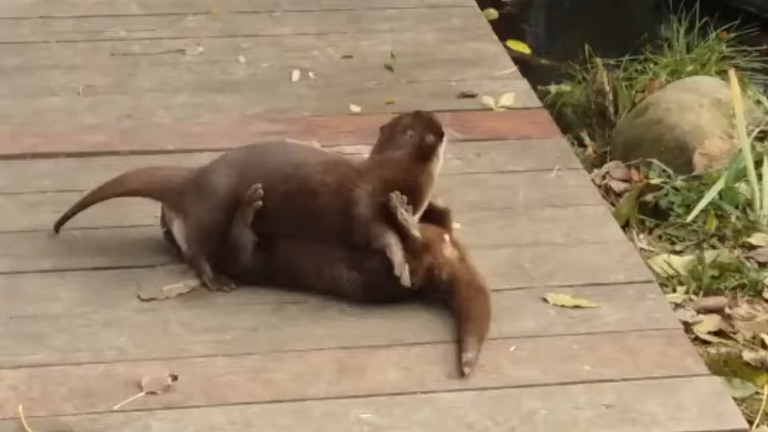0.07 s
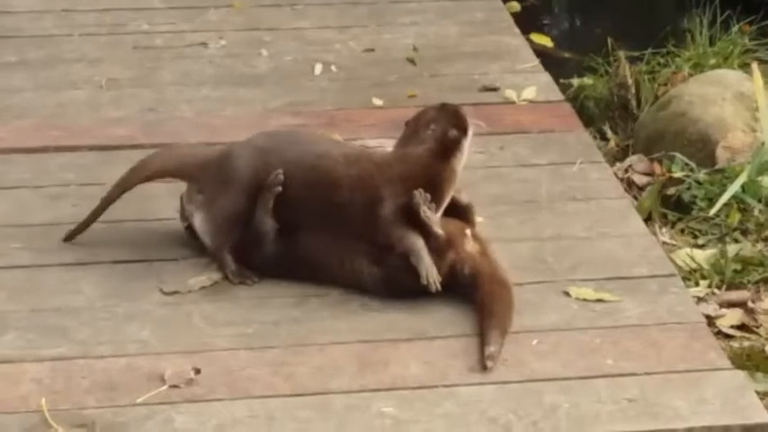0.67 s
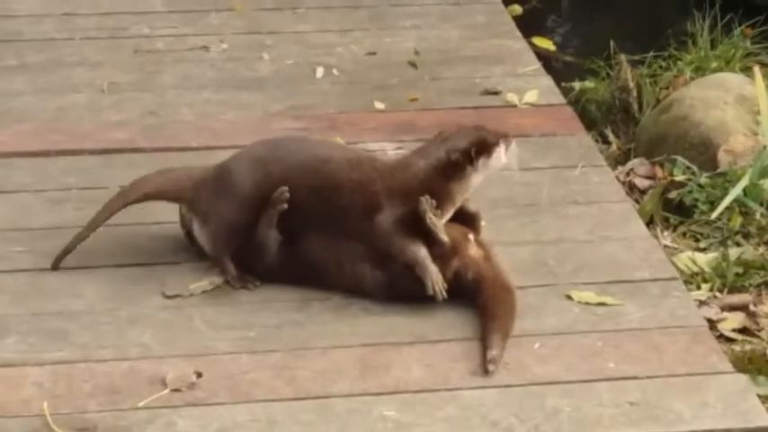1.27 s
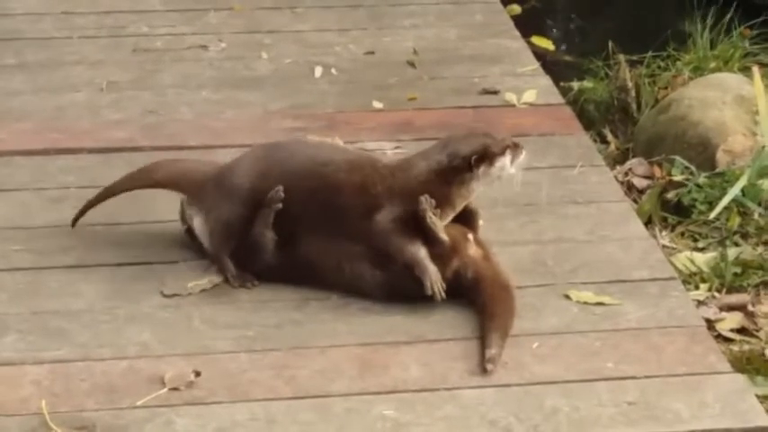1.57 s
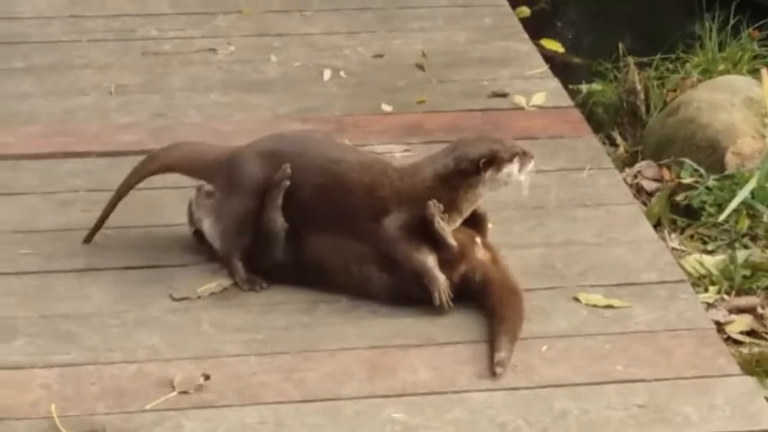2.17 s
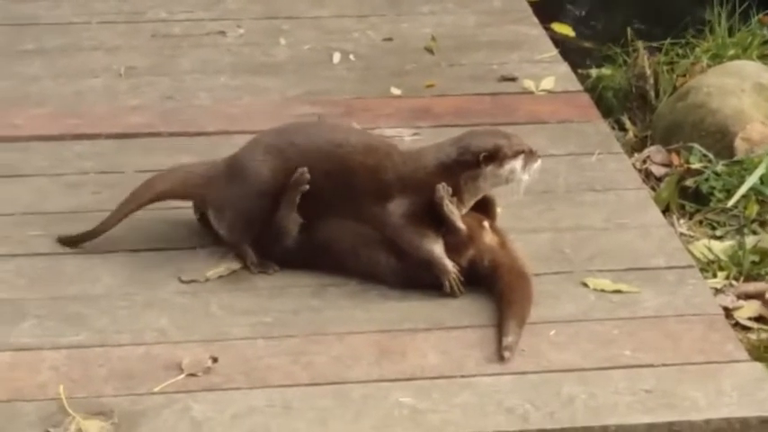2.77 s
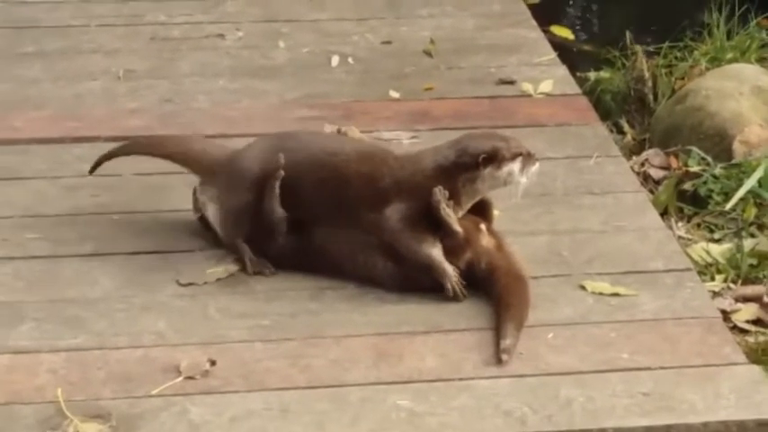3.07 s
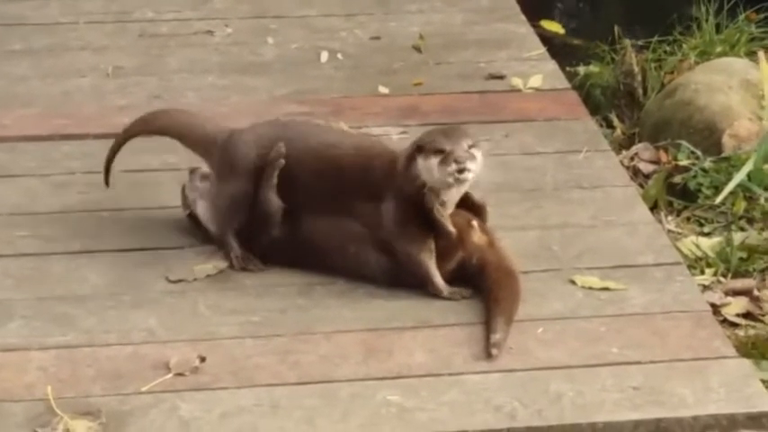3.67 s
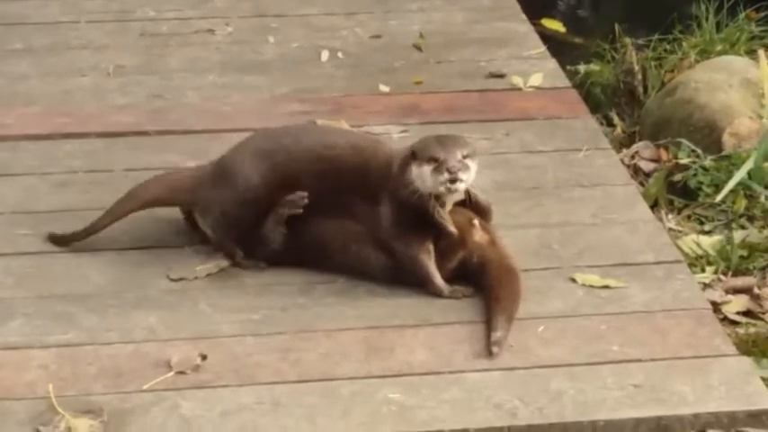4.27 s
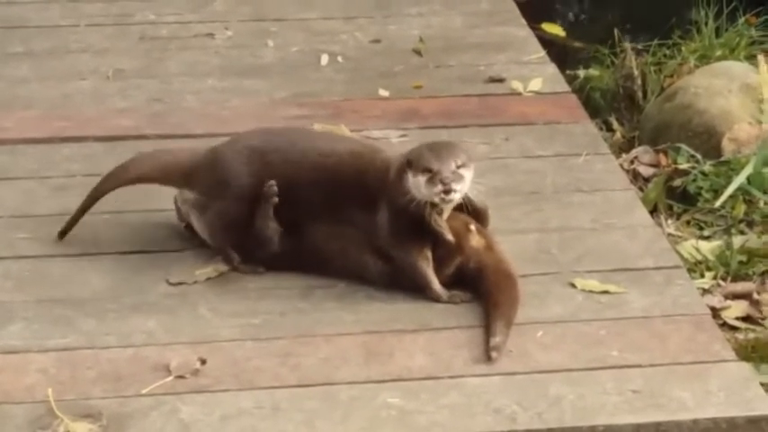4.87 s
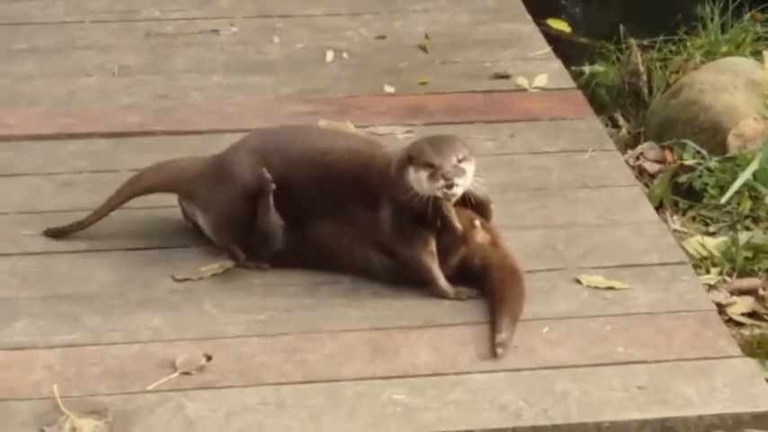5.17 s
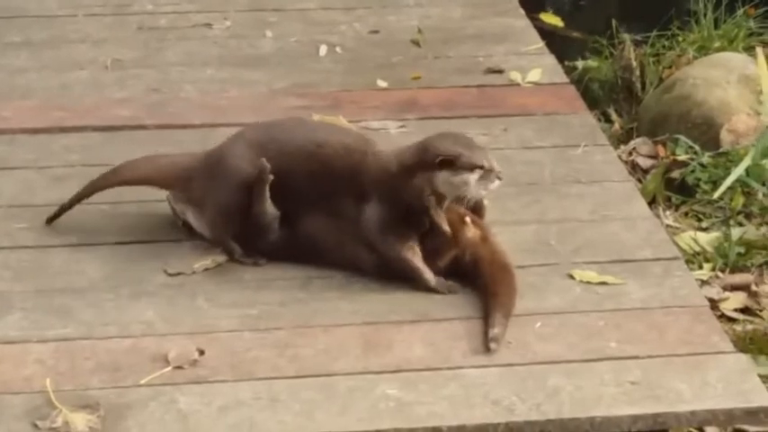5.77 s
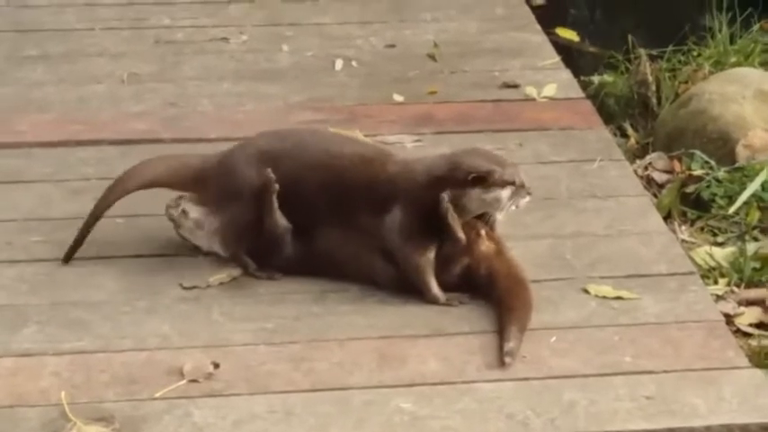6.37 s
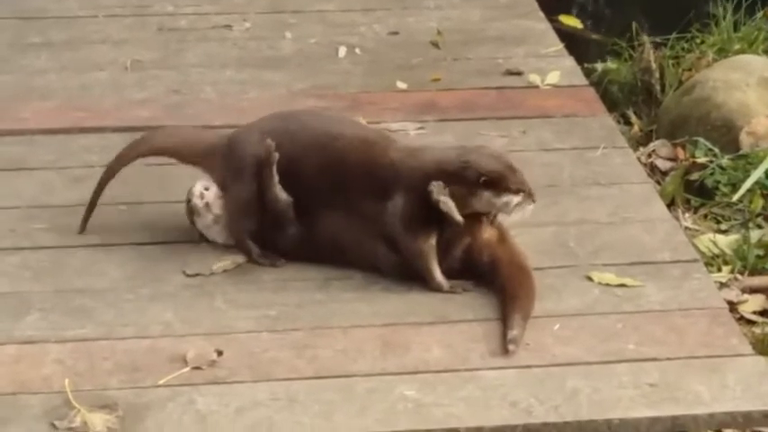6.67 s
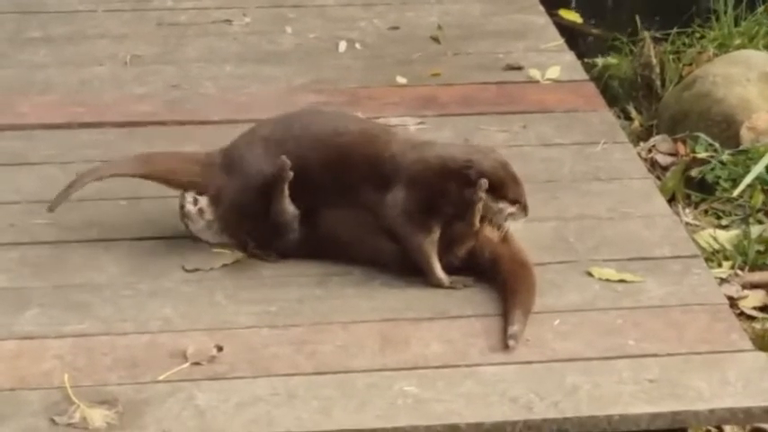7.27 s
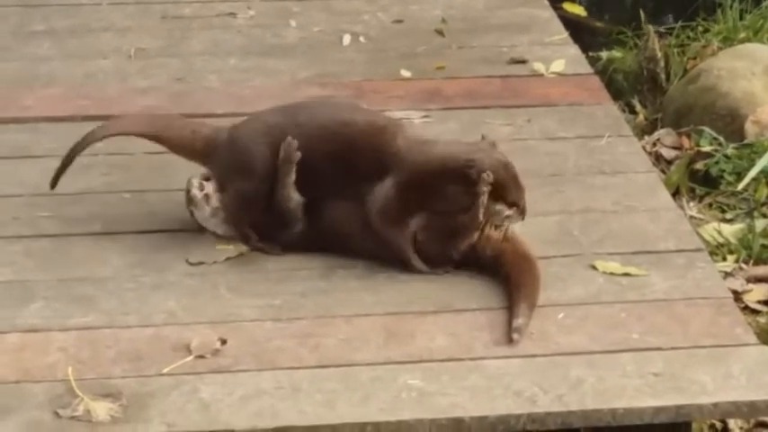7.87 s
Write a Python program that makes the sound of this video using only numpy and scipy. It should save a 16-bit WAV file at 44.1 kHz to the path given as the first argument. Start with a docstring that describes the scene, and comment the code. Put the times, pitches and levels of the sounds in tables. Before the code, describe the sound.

After a brief silence, at about 0.4 seconds, two otters start long, high squeals together on an outdoor wooden deck, over a soft steady hiss. Wind buffets the microphone with low rumble and thumps, louder than the voices from 0.6 to 1.5 seconds and dying away by 2. The calls slide slightly down onto wavering notes, so close in pitch that they beat against each other. Fresh wails begin around 2.3 and 2.7 seconds, growing brighter and louder from 3.5. Both otters start again just after 4 seconds, with small raspy catches in the voice, the clearest near 5.4. At 6 seconds one begins the loudest wail, and the other joins with a nasal whine at about 6.7. Both hold until the end, around 8 seconds. Lighter wind gusts return near 4 seconds and between 5.5 and 7.5.

```python
"""On a wooden deck outdoors, two otters wail together in long, overlapping squeals.
Each voice is a source and a filter: the vocal folds make harmonics, which throat and mouth shape.
A call starts high and sinks onto a wavering note near 850 Hz; the two close pitches beat.
The boards return short reflections, and turbulent gusts buffet the microphone over a soft hiss."""
import sys
import numpy as np
from scipy import signal
from scipy.fft import rfft, irfft, next_fast_len
from scipy.io import wavfile
from scipy.ndimage import uniform_filter1d

SR = 44100
rng = np.random.default_rng(int(sys.argv[2]) if len(sys.argv) > 2 else 0)


def generate_wav(sig):
    """Save sig (samples, or channels by samples) to the path in sys.argv[1] as 16-bit PCM at SR."""
    pcm = np.round(np.clip(np.atleast_2d(sig).T, -1, 1) * 32767).astype(np.int16)
    wavfile.write(sys.argv[1], SR, pcm)


N = 357651
T = np.arange(N) / SR
START_S = .42  # silent until here
SIDES = np.array([[.5], [-.5]])  # splits a difference between the left and right microphone ports


def undb(db):
    """Amplitude ratio of a level in decibels."""
    return 10 ** (np.asarray(db) / 20)


def unit(x):
    """Normalisation to rms 1."""
    return x / np.sqrt(np.mean(x ** 2) + 1e-18)


def curve(rows, at=T):
    """Linear interpolation between (position, value) rows."""
    return np.interp(at, *np.transpose(rows))


def gain_at(spectrum, hz):
    """Magnitude response of (f/Hz, gain/dB) rows, interpolated in log frequency."""
    f, db = np.transpose(spectrum)
    return undb(np.interp(np.log(hz + 1), np.log(f), db))


def colour(x, spectrum):
    """Zero-phase filtering by (f/Hz, gain/dB) rows."""
    size = next_fast_len(x.shape[-1])
    hz = np.arange(size // 2 + 1) * SR / size
    return irfft(rfft(x, size) * gain_at(spectrum, hz), size)[..., :x.shape[-1]]


def drift(rate_hz, size):
    """Random modulation: smooth steps between rate_hz Gaussian values a second."""
    place = np.arange(size) * rate_hz / SR
    steps = rng.standard_normal(N // 32)
    k = place.astype(int)
    blend = (place - k) ** 2 * (3 - 2 * (place - k))
    return steps[k] * (1 - blend) + steps[k + 1] * blend


# gusts: t/s, level/dB, half-width/s
GUST_SWELLS = [(0.603, -24, 0.069), (0.866, -26.5, 0.22), (1.06, -22, 0.054), (1.236, -22.5, 0.04),
               (1.496, -28, 0.097), (1.892, -36.5, 0.093), (2.644, -48, 0.027), (3.945, -36, 0.1),
               (4.426, -42.5, 0.35), (5.62, -37, .12), (5.895, -31, 0.035), (6.027, -30.5, 0.027),
               (6.44, -31, 0.06), (6.816, -28, 0.097), (7.237, -33, 0.11), (7.8, -41.5, 0.23)]
# windward bias, left minus right: t/s, level/dB
WINDWARD = [(.6, 7.5), (1.1, 13), (2, 12.5)]
# spectrum of the rumble: f/Hz, level/dB
RUMBLE_SPECTRUM = [(25, -49), (65, 4), (155, 0), (350, -23), (700, -34), (4000, -98)]
def wind(breeze_db=-74, flutter_db=4, eddy_db=-4, rumble_side=0.68):
    """Turbulence: stronger gusts shed smaller eddies, mostly at the windward port."""
    gust_power = sum(undb(db) ** 2 / np.cosh(np.clip((T - s) / half_s, -20, 20)) ** 2
                     for s, db, half_s in GUST_SWELLS)
    level_db = 10 * np.log10(undb(breeze_db) ** 2 + gust_power)
    side_db = SIDES * curve(WINDWARD)
    rumble = unit(colour(rng.standard_normal((2, N)), RUMBLE_SPECTRUM)) * undb(rumble_side * side_db)
    eddy_spectrum = [(60, -2.0), (290, 6.5), (1000, -34.5), (5000, -76)]
    eddies = unit(colour(rng.standard_normal((2, N)), eddy_spectrum))
    eddies *= undb(eddy_db + level_db - level_db.max() + side_db)
    return (rumble + eddies) * undb(level_db + flutter_db * drift(40, N))


# soft hiss, much quieter above 5 kHz: f/Hz, level/dB
HISS_SPECTRUM = [(60, 4.5), (400, 3.5), (1400, 4), (4300, -2), (5700, -19), (10000, -29.5)]
def background_hiss(level_db=-46, shared=0.87, swell_db=-0.6, rise_s=0.27):
    """Partial coherence: a soft hiss is partly alike on the two sides."""
    noise = rng.standard_normal((3, N))
    hiss = unit(colour(noise[:2] + shared * noise[2], HISS_SPECTRUM))
    rise = np.clip((T - START_S) / rise_s, 0, 1)
    return hiss * undb(level_db + swell_db * drift(6, N)) * rise


def pitch_and_level(call, note, t, flicks, push_db,
                    glide_s=.07, flick_s=0.0176, push_s=0.23, fade_db=8, fade_s=0.014):
    """Frequency and amplitude modulation: a call sinks onto its note, swells and fades."""
    overshoot, full_db, soft_db, swell_s = call[:4]
    age = t - note[0][0]
    remaining = np.maximum(note[-1][0] - t, 0)
    held_hz = curve(note, t)
    flick = sum(rise * np.exp(-((t - s) / flick_s) ** 2) for s, rise in flicks)
    bend = overshoot * np.exp(-age / glide_s) + flick
    swell_db = full_db - soft_db * np.maximum(1 - age / swell_s, 0)
    level_db = swell_db - fade_db * np.exp(-remaining / fade_s)
    # each percent the note is pushed above its running mean adds push_db
    mean_hz = uniform_filter1d(held_hz, int(push_s * SR), mode="nearest")
    push_percent = np.clip(100 * (held_hz / mean_hz - 1), -4, 4)
    return held_hz * (1 + bend), level_db + push_db * push_percent


# the upper otter's mouth: t/s, opening (0 shut, 1 wide)
MOUTH_OPENING = [(.5, 0.24), (.9, 0.48), (1.6, 0.54), (2.35, 0.33), (2.7, 0.081), (3.44, 0.047),
                 (3.56, 0.8), (3.75, 1), (5.7, 1), (5.82, 0.42)]
def squeal(call, note, shut, wide, flicks=(), gape_db=0, push_db=0, effort_tilt=0,
           tremor=0.00427, jitter=.0032, shimmer=0.087, wander_db=1.34, flicker_db=1.0, breath_db=-39,
           tighten=0.53, tilt_above_hz=3130, chest_s=0.31, attack_s=0.0036, release_s=0.008):
    """Source-filter model: the mouth shapes breath and the harmonics of unevenly vibrating folds."""
    start, end = note[0][0], note[-1][0]
    span = (T >= start) & (T < end + release_s)
    t = T[span]
    size = len(t)
    pitch, level_db = pitch_and_level(call, note, t, flicks, push_db)
    _, full_db, _, _, chest_db, bright_db = call
    # muscle tremor and cycle-to-cycle jitter
    hz = pitch * (1 + tremor * drift(55, size) + jitter * drift(600, size))
    phase = 2 * np.pi * np.cumsum(hz) / SR
    # a higher note tightens the throat, so its resonances rise with the pitch
    relaxed_hz = hz * (np.median(hz) / hz) ** tighten
    slow = slice(None, None, 64)  # control rate of the filter
    gape = curve(MOUTH_OPENING, t[slow])
    # below full voice the treble drops by effort_tilt dB an octave for each dB
    tilt_db = bright_db + effort_tilt * (level_db[slow] - full_db)
    tone, power = 0, 0
    for k in range(1, 18):
        tract_hz = k * relaxed_hz[slow]
        gain = gain_at(shut, tract_hz) ** (1 - gape) * gain_at(wide, tract_hz) ** gape
        gain *= undb(tilt_db * np.log2(np.maximum(k * hz[slow] / tilt_above_hz, 1)))
        if k == 1:  # the fundamental is fuller at the start of a call
            gain *= undb(chest_db * np.exp((start - t[slow]) / chest_s))
        gain = np.interp(t, t[slow], gain)
        power += gain ** 2 / 2
        waver_db = flicker_db * np.sqrt(k) * drift(28.02, size) + wander_db * drift(5.06, size)
        tone += gain * undb(waver_db) * np.sin(k * phase + 2 * np.pi * rng.random())
    # air escapes once a cycle, while the folds are apart
    breath = unit(colour(rng.standard_normal(size) * (1 + np.cos(phase)), wide))
    voice = tone / np.sqrt(power) * (1 + shimmer * drift(400, size)) + undb(breath_db) * breath
    edges = np.minimum((t - start) / attack_s, 1) * np.minimum((end - t) / release_s + 1, 1)
    out = np.zeros(N)
    # a wide mouth radiates gape_db more than a shut one
    out[span] = voice * edges * undb(level_db + gape_db * curve(MOUTH_OPENING, t))
    return out


# throat and mouth responses: f/Hz, then gain/dB for
# upper otter shut, wide, head down; lower otter muffled, free
TRACT_RESPONSES = [(920, -9.5, -13.5, -6, -16.5, -7), (1880, -6, -11.5, 2.5, -2.5, 0),
                   (2790, -2, 2.5, -7.5, -8.5, -6.5), (3450, -0.5, 1.5, -6, 5, 6),
                   (4080, 12, -4, -12, -5, -11.5), (5185, -18, -.5, -7.5, -14.5, -12),
                   (6080, -23, -17.5, -29, -24, -27), (6440, -18.5, -22.5, -18.5, -17.5, -20.5),
                   (7740, -16, -24, -18, -19.5, -13.5), (8180, -30.5, -6, -20.5, -37, -26.5),
                   (9840, -57, -44.5, -40.5, -44, -40), (11620, -70, -25, -45, -54, -35.5),
                   (13150, -65, -56, -48, -55, -60)]
def vocal_tract(column):
    """Formants: the resonances of one throat and mouth shape, as (f/Hz, gain/dB) rows."""
    return np.array(TRACT_RESPONSES)[:, [0, column]]


# the lower otter's calls: onset overshoot/fraction of pitch, full level/dB, onset softening/dB,
# swell time/s, onset boost of the fundamental/dB, treble tilt/(dB per octave)
LOWER_SQUEALS = [(0.0133, -36, 8.1, 0.2, 1, -2), (.168, -41.5, 1.3, 0.032, 7.2, -9),
                 (.074, -38.5, 6, 0.038, 10, -4.5), (.126, -34.5, 6.65, 0.43, 4.3, 0.5),
                 (.105, -27.5, 10.3, 0.26, 1.8, 2)]
# held pitch, one list a call: t/s, f/Hz
LOWER_PITCH = [
    [(0.43, 889), (0.714, 842.4), (0.895, 866), (0.918, 840)],
    [(1.32, 871), (1.399, 868), (1.466, 762), (1.6, 804), (1.723, 771), (1.924, 800), (2.248, 730)],
    [(2.65, 998), (2.764, 974), (2.832, 907), (2.966, 849), (3.132, 847), (3.307, 778), (3.469, 838),
     (3.708, 791)],
    [(4.08, 902), (4.238, 926), (4.736, 878), (4.979, 809), (5.113, 858), (5.318, 818.5), (5.446, 851),
     (5.577, 811)],
    [(6.021, 976), (6.163, 993.5), (6.317, 900), (6.391, 880), (6.709, 809.3), (6.874, 844.3), (7.048, 812),
     (7.319, 861), (7.415, 817.5), (7.692, 860), (7.764, 821), (8.11, 807)],
]
def lower_otter():
    """Spectral tilt: falling squeals with a formant near 3.4 kHz brighten with vocal effort."""
    muffled, free = vocal_tract(column=4), vocal_tract(column=5)
    *cries, wail = zip(LOWER_SQUEALS, LOWER_PITCH)  # muffled under its mate until the last, loudest call
    crying = sum(squeal(*cry, muffled, muffled, push_db=1.72, effort_tilt=1.0) for cry in cries)
    return crying + squeal(*wail, free, free, push_db=0.9, effort_tilt=0.65)


# the upper otter's calls: columns as in LOWER_SQUEALS
UPPER_SQUEALS = [(0.0089, -44, 9, 0.22, -1, 0.5), (0.063, -37, 9, 0.59, 14.5, 2),
                 (.077, -38, 6.5, 0.36, 16.5, 1), (0.33, -36.5, 4, 0.8, 10.5, 5.5)]
# held pitch, one list a call: t/s, f/Hz
UPPER_PITCH = [
    [(0.431, 895), (0.644, 855), (0.871, 866), (1.889, 834), (1.937, 860)],
    [(2.335, 845), (2.384, 893), (2.648, 917.6), (2.748, 889), (2.921, 899), (3.453, 851), (3.519, 875.4),
     (3.725, 830), (4.066, 854)],
    [(4.295, 856.6), (4.458, 909.7), (5.026, 865.7), (5.089, 881.3), (5.19, 851), (5.436, 884),
     (5.492, 868), (5.733, 872.5), (5.847, 837), (6.311, 859), (6.396, 896)],
    [(6.67, 899), (6.771, 946), (7.494, 896), (8.11, 887)],
]
# quick flicks of the voice: t/s, rise/fraction of pitch
PITCH_FLICKS = [(2.39, 0.0252), (4.06, .02), (4.295, .015), (4.326, -.018)]
def upper_otter():
    """Mouth radiation: bright wails grow louder as the mouth opens; a nasal whine follows, head down."""
    shut, wide, head_down = vocal_tract(column=1), vocal_tract(column=2), vocal_tract(column=3)
    *wails, whine = zip(UPPER_SQUEALS, UPPER_PITCH)
    wailing = sum(squeal(*wail, shut, wide, PITCH_FLICKS, gape_db=9, push_db=.5) for wail in wails)
    return wailing + squeal(*whine, head_down, head_down, push_db=.5, effort_tilt=0.59)


# the voices, left minus right: f/Hz, level/dB
LEVEL_DIFFERENCE = [(1700, -1), (2550, -3), (3400, -9), (4250, -10.5), (5100, -8.5), (8500, -3.5),
                    (11000, -1.5)]
def stereo_colouring(voice, lead):
    """Stereo colouring: a voice is louder on the right; the phase between sides varies with frequency."""
    size = next_fast_len(N)
    hz = np.arange(size // 2 + 1) * SR / size
    transfer = gain_at(LEVEL_DIFFERENCE, hz) ** SIDES * np.exp(1j * SIDES * curve(lead, hz))
    pair = irfft(rfft(voice, size) * transfer, size)[:, :N]
    return pair * np.std(voice) / np.std(pair)


# lead of the left side for each voice: f/Hz, phase/rad
UPPER_LEAD = [(850, -0.22), (3400, -1.1), (8500, -1.06)]
LOWER_LEAD = [(1700, 0.77), (3400, 0.9), (5100, 1.74), (6800, 1.5), (11000, 3.5)]
def deck(upper, lower, early_db=-13, early_s=0.008, tail_db=-22, t60_s=1.0):
    """Superposition: both voices, early reflections off the boards and faint garden reverberation."""
    t = T[:SR]
    early, tail = rng.standard_normal((2, 2, len(t)))
    boards = undb(early_db) * unit(early * np.exp(-t / early_s))
    garden = undb(tail_db) * unit(tail * undb(-60 * t / t60_s))
    response = (boards + garden) / np.sqrt(len(t))
    echoes = signal.fftconvolve((upper + lower)[None], response, axes=1)[:, :N]
    return stereo_colouring(upper, UPPER_LEAD) + stereo_colouring(lower, LOWER_LEAD) + echoes


# big eddies striking the ports: t/s, level before filtering/dB
EDDY_STRIKES = [(0.579, -14), (0.687, -14.5), (0.831, -9), (0.922, -9), (1.059, -8), (1.101, -10.5),
                (1.755, -17.5), (1.876, -25.5), (1.98, -21.5), (2.633, -34.5), (5.55, -23.5), (7.243, -16),
                (7.319, -17.5)]
def buffets(swing_hz=165, decay_s=0.0036):
    """Damped oscillation: a big eddy's knock dies within a swing or two of pressure."""
    pressure = np.zeros(N)
    for s, db in EDDY_STRIKES:
        age = np.maximum(T - s, 0)
        pressure += undb(db) * np.exp(-age / decay_s) * np.sin(2 * np.pi * swing_hz * age)
    knocks = colour(pressure, [(30, -17), (130, -1), (330, 7.5), (900, 5.5), (3000, -58)])
    return knocks * undb(SIDES * curve(WINDWARD))


# catches and breaks in a voice: t/s, level/dB, half-width/s
VOICE_CATCHES = [(0.914, -48, .008), (2.338, -42, .004), (2.65, -60, .007), (4.301, -45, .005),
                 (5.23, -47.5, .02), (5.424, -35.5, 0.0043), (6.018, -49, .007)]
def rasps():
    """Aperiodic vibration: the folds flap irregularly for a moment as a voice catches."""
    bursts = sum(undb(db) * np.exp(-((T - s) / half_s) ** 2) for s, db, half_s in VOICE_CATCHES)
    spectrum = [(400, -18), (1000, -3), (4300, -0.5), (9000, -25.5), (14000, -50)]
    return bursts * unit(colour(rng.standard_normal(N), spectrum))


def scene():
    """Sound pressures add: both otters on the deck, the wind and the hiss."""
    return deck(upper_otter() + rasps(), lower_otter()) + wind() + buffets() + background_hiss()


def record(dry, fade_s=0.065, low_cut_hz=45, high_cut_hz=15700):
    """Band limiting: the sound fades in after silence and loses its deepest rumble and highest treble."""
    fade = np.clip((T - START_S) / fade_s, 0, 1)
    highpass = signal.butter(2, low_cut_hz, "highpass", fs=SR, output="sos")
    lowpass = signal.ellip(10, .1, 80, high_cut_hz, fs=SR, output="sos")
    return signal.sosfilt(lowpass, signal.sosfilt(highpass, dry * fade))


dry = scene()
out = record(dry)
generate_wav(out)
```